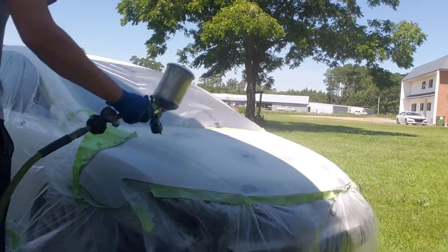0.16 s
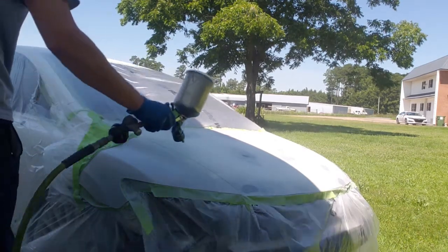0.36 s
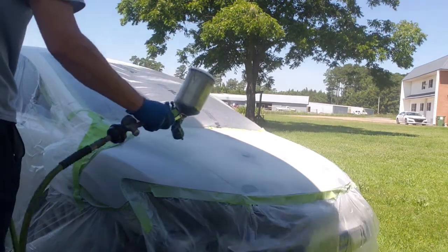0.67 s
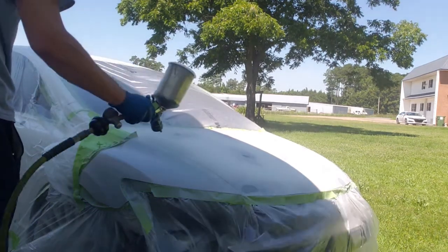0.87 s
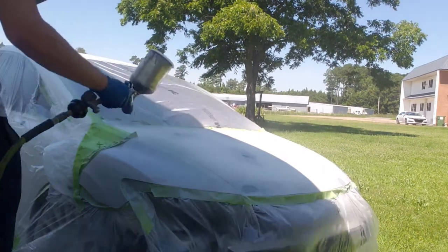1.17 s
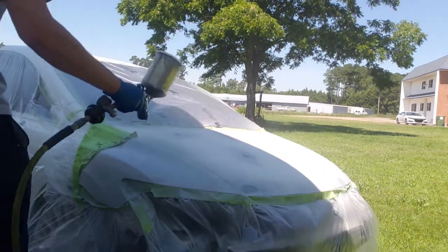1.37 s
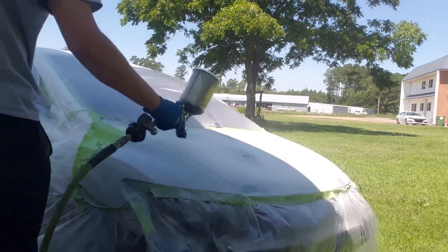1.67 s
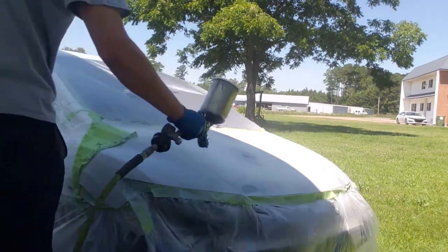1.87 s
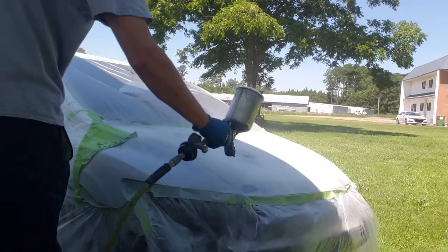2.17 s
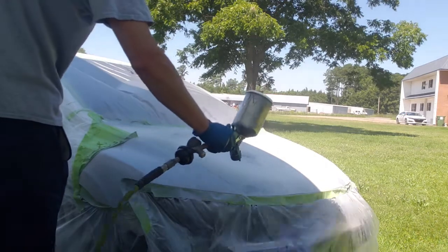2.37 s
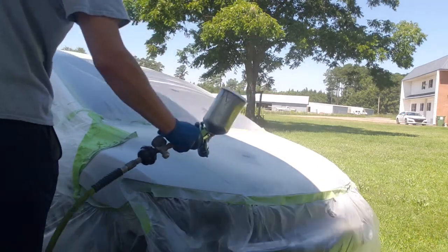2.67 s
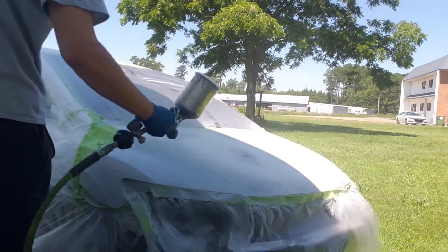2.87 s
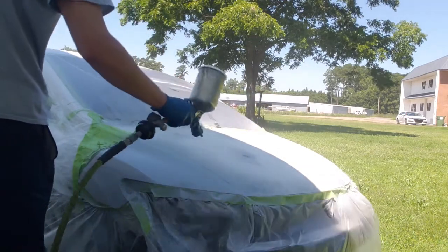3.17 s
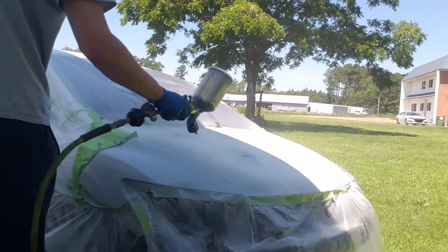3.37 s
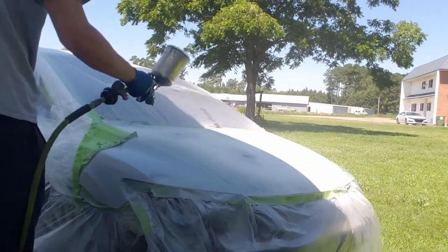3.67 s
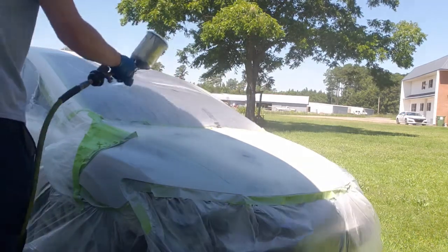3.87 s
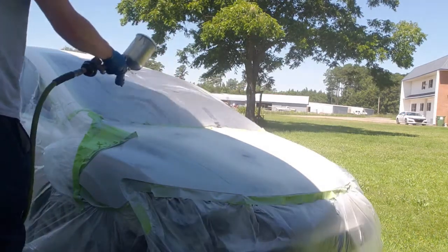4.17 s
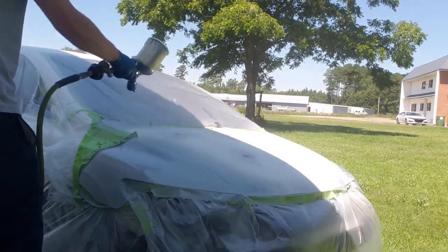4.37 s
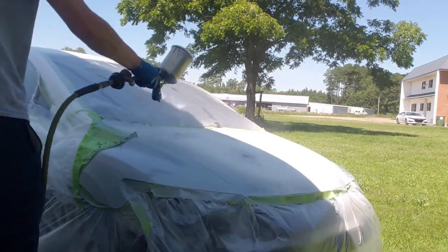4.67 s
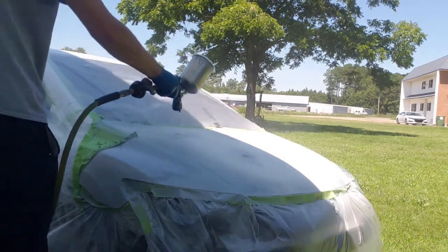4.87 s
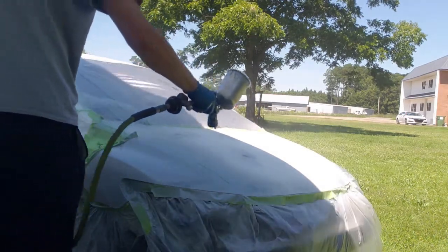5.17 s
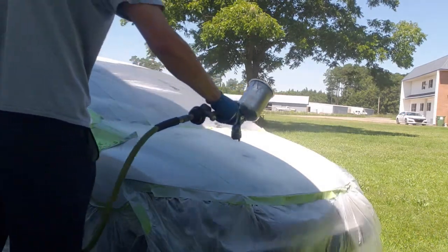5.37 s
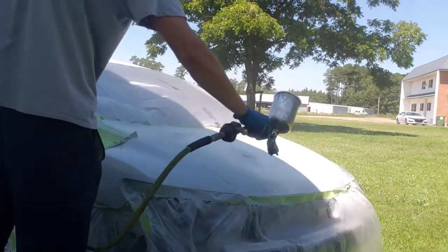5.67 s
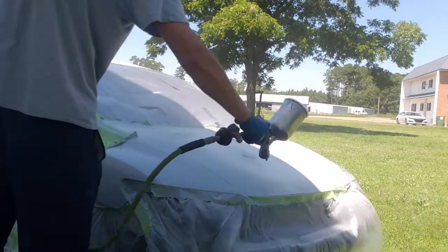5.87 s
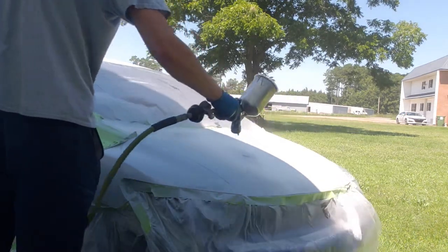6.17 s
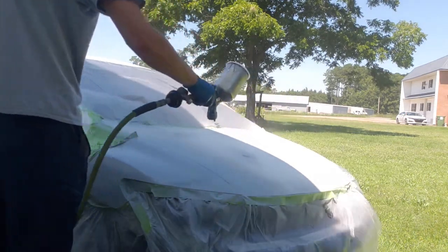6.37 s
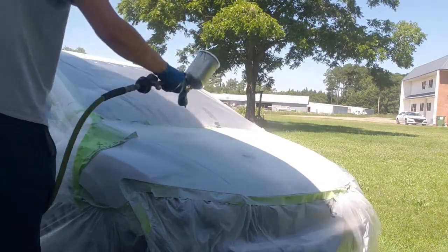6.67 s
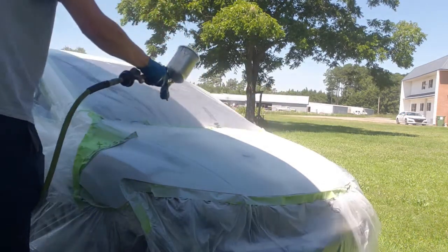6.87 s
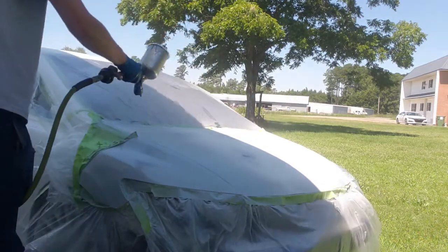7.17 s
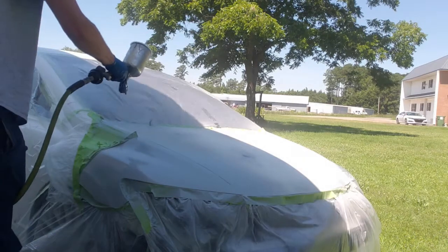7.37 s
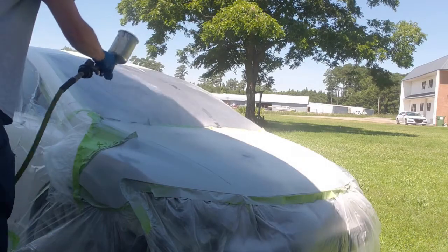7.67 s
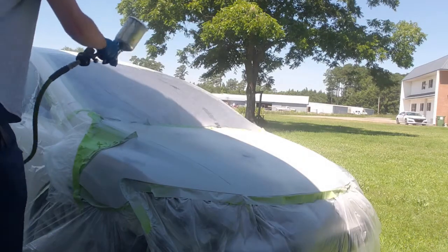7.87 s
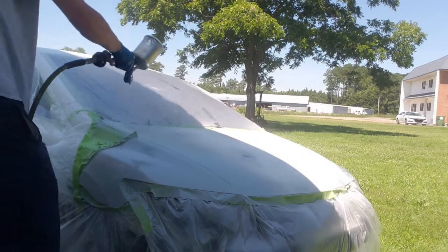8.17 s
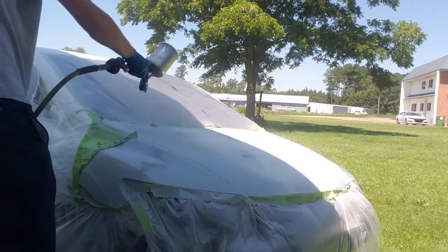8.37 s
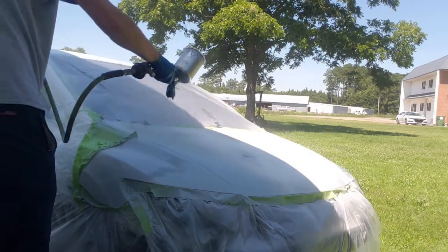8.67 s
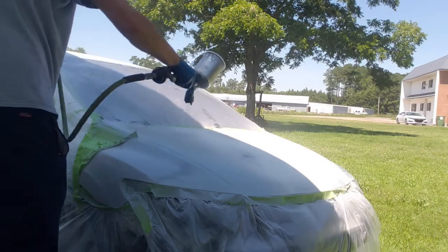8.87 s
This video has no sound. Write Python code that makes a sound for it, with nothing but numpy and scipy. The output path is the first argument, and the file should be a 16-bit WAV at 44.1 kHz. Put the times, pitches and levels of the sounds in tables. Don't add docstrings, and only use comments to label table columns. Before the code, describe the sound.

A paint spray gun hisses brightly in three long bursts outdoors, with two brief gaps of thin leaking air over faint low rumble.

```python
import sys
import numpy as np
from scipy import signal
from scipy.fft import rfft, irfft, next_fast_len
from scipy.io import wavfile
from scipy.ndimage import uniform_filter1d

SR = 44100
rng = np.random.default_rng(int(sys.argv[2]) if len(sys.argv) > 2 else 0)


def gain_from_db(level_db):
    decades = np.asarray(level_db, float) / 20
    return 10 ** decades


def unload_audio(sound):
    columns = np.transpose(np.atleast_2d(sound))
    steps = np.round(np.clip(columns, -1, 1) * 32767)
    wavfile.write(sys.argv[1], SR, steps.astype(np.int16))


N = 397782

# (valve opens [s], valve closes [s])
VALVE_S = [
    (-1.0, 3.606),
    (3.977, 7.655),
    (8.071, 10.0),
]
# (time [s], lag of left behind right [samples], echo strength [dB])
SWEEP = [(0, 3, 0), (.6, 2.1, 0), (1.25, 4.5, 0), (1.75, 1.2, 0), (2.25, -.1, 0), (2.75, 1.2, 0),
         (3.3, 1.2, 0), (3.95, 4.2, 2), (4.4, 4.5, 1), (4.75, 2.4, 1), (5.75, -2.1, 0), (6.6, 1.2, 2),
         (7.0, 4.5, 3), (7.75, 5.2, 4), (8.2, 4.2, 2), (8.55, 5, 2), (8.8, 2.2, 1), (9.02, 1.2, 1)]

FRAME, HOP = 512, 128
HZ = np.arange(FRAME // 2 + 1) * SR / FRAME
FRAME_S = np.arange(N // HOP + 2) * HOP / SR
T = np.arange(N) / SR


def on_log(table, hz, column=1):
    rows = np.array(table, float)
    return np.interp(np.log(hz + 1), np.log(rows[:, 0]), rows[:, column])


def on_time(table, t):
    s, *columns = np.array(table, float).T
    return [np.interp(t, s, c) for c in columns]


def swells(rows, t, column=2):
    return sum(r[column] * np.exp(-((t - r[0]) / r[1]) ** 2) for r in rows)


def blotches(seconds, hz):
    field = rng.standard_normal((len(HZ), len(FRAME_S)))
    for axis, span in enumerate((hz * FRAME / SR, seconds * SR / HOP)):
        for _ in range(2):
            field = uniform_filter1d(field, max(int(span), 1), axis=axis)
    return field / field.std()


def hiss(db, alike=1):
    # (frequency [Hz], share common to both ports [0-1])
    likeness = [(200, .995), (400, .92), (700, .7), (1400, .9), (2600, .95), (4000, .9), (8000, .65),
                (15000, .45)]
    body_samples, body_share, body_top_hz = 17.5, .45, 9000
    draw = rng.standard_normal((2, 4, len(HZ), len(FRAME_S)), dtype=np.float32)
    cells = draw[0] + 1j * draw[1]
    share = alike * on_log(likeness, HZ)[:, None]
    around = body_share * (np.clip(HZ / 1000, 0, 1) / (1 + (HZ / body_top_hz) ** 4))[:, None]
    lag = on_time(SWEEP, FRAME_S)[0]
    late = np.exp(-2j * np.pi * HZ[:, None] * (body_samples - lag) / SR)
    detour = cells[1] * np.array([late, np.ones_like(late)])
    common = np.sqrt(1 - around) * cells[0] + np.sqrt(around) * detour
    cells = np.sqrt(share) * common + np.sqrt(1 - share) * cells[2:]
    return signal.istft(cells * gain_from_db(db), nperseg=FRAME, noverlap=FRAME - HOP)[1][:, :N]


def port_colour(table, pan_db):
    colour = np.array([on_log(table, HZ, column=1), on_log(table, HZ, column=2)])[:, :, None]
    shade = np.clip(HZ / 9000, 0, 1)[:, None] * (pan_db - pan_db.mean()) / 2
    return colour + np.array([shade, -shade]) - 60 * (HZ < 150)[:, None]


def jet():
    # (time [s], hiss level [dB], nozzle turned from the left port [dB])
    hand = [(0.0, -28, -2), (0.45, -27, -4.5), (1.0, -31, -5), (1.5, -30.5, -3.5), (1.95, -28.5, -5),
            (2.3, -29.5, -4.5), (2.9, -29.5, -5.5), (3.55, -31, -6), (4.05, -29, -7), (4.55, -29, -4.5),
            (4.95, -27.5, -4.5), (5.3, -31, -7), (5.75, -25.5, -5), (6.2, -30.5, -7), (6.7, -30.5, -4),
            (7.2, -31.5, -9), (8.15, -26.5, -6.5), (9.02, -28, -5.5)]
    # (time [s], half length [s], level [dB])
    surges = [(.51, .04, 3), (.74, .03, 1.5), (1.25, 0.043, 2.5), (2.34, .06, 2.5), (3.05, .03, -0.5),
              (3.26, 0.076, 4.5), (3.45, 0.095, 2.5), (3.59, .03, 2), (4.22, 0.046, 0), (5.63, 0.046, 0.5),
              (5.78, 0.026, 1), (7.12, .04, -0.5), (8.45, 0.2, -2), (6.6, 0.22, 2.5), (7.5, 0.11, -1.5),
              (4.9, 0.08, 1.5)]
    # (frequency [Hz], left level [dB], right level [dB])
    colour = [(197, -27.5, -26.5), (323, -26.5, -25.5), (515, -27, -27), (795, -21, -23.5),
              (1296, -16, -18), (1760, -16, -14), (3130, -11.5, -12), (4800, -12.5, -7.5),
              (6500, -8.5, -9.5), (7130, -14, -12.5), (10160, -6.5, -5.5), (12350, -7.5, 5),
              (14800, -4, -2), (16100, -1, 9.5)]
    # (time [s], centre frequency [Hz], level over the hiss [dB])
    spit_rows = [
        (.552, 3200, 9.5),
        (2.398, 3000, 7.5),
        (3.22, 3230, 7.5),
        (3.577, 3600, 3),
        (5.7, 2980, 5.5),
        (7.612, 3000, 0),
        (8.198, 4500, 6.5),
    ]
    octave = np.log2(HZ + 1)[:, None]
    hand_db, pan_db = on_time(hand, FRAME_S)
    lag, echo_db = on_time(SWEEP, FRAME_S)
    top_db = hand_db + swells(surges, FRAME_S)
    change, away = top_db - top_db.mean(), lag - lag.mean()

    rush = (0.067 - 1) * change - 0.39 * away
    body = (0.23 - 1) * change + 0.04 * away
    tilt = 0
    for move, centre in ((rush, 10), (body, 11.75)):
        near = np.clip(1 - abs(np.clip(octave, 10, 13.5) - centre) / 1.75, 0, 1)
        tilt = tilt + move * near

    shade_hz, shade_octaves, shade_db_per_echo_db = 6450, 0.49, -0.5
    shaded = np.exp(-((octave - np.log2(shade_hz)) / shade_octaves) ** 2)
    tilt = tilt + shade_db_per_echo_db * echo_db * shaded

    flutter = 0.31 * blotches(.03, 7000) + 0.59 * blotches(.006, 7100) + .5 * blotches(0.072, 4000)
    spits = 0
    for s, hz, db in spit_rows:
        spits = spits + db * np.exp(-((FRAME_S - s) / 0.0072) ** 2 - ((octave - np.log2(hz)) / 0.69) ** 2)
    own = np.array([blotches(0.26, 180), blotches(0.28, 180)])
    patches = 2.8 * own + 2.05 * blotches(0.17, 100)
    patches *= np.clip(HZ / 1500, 0, 1)[:, None] / (1 + (HZ[:, None] / 20000) ** 2)
    return hiss(port_colour(colour, pan_db) + top_db + tilt + flutter + spits + patches - 14.0)


def valve(air):
    puff_db = [
        0,
        12,
        14.5,
    ]
    open_s, burst_s, creep_s, puff_hz = .009, .018, .008, 7000
    shut_t60_s, hose_db, hose_t60_s, hose_hz = 0.015, -5.5, 0.34, 1300
    flow, puff, bleed = 0, 0, 0
    for (opens, closes), burst_db in zip(VALVE_S, puff_db):
        since = np.clip(T - opens, 0, None)
        after = np.clip(T - closes, 0, None)
        creep = np.clip((T - opens + creep_s) / (open_s + creep_s), 0, 1) ** 2
        flow = flow + creep * gain_from_db(-60 * after / shut_t60_s)
        burst = gain_from_db(burst_db * np.exp(-(since / burst_s) ** 2)) - 1
        puff = puff + np.clip(since / open_s, 0, 1) ** 3 * burst
        bleed = bleed + (after > 0) * gain_from_db(hose_db - 60 * after / hose_t60_s)
    treble = signal.sosfilt(signal.butter(1, puff_hz, "high", fs=SR, output="sos"), air)
    hose = signal.sosfilt(signal.butter(1, hose_hz, fs=SR, output="sos"), air[::-1])
    return flow * air + puff * treble + bleed * hose


def paths(sound):
    echo_rows = [(29.47, -0.32, 2, 0.11, 0.17), (39.1, -0.7, 2.5, -0.1, -0.18),
                 (49.93, -1.05, -8, 0.25, 0.034), (85.3, 4.5, -9, 0.21, 0.18),
                 (112.3, 2.5, -1, 0.36, -0.086), (147.5, 0, -13, 0.21, 0.097),
                 (206.2, 2.5, 13.5, 0.11, -0.17), (317.8, -4.0, 25, 0.28, -0.19)]
    echo_band_hz = [500, 11000]
    lag, echo_db = on_time(SWEEP, T)
    lag = uniform_filter1d(lag, SR // 4)
    finer = 3
    fine = finer * irfft(rfft(sound, next_fast_len(N)), finer * next_fast_len(N))
    grid = np.arange(fine.shape[1]) / finer
    dull = signal.butter(1, echo_band_hz, "band", fs=SR, output="sos")
    out = []
    for port in range(2):
        here = np.arange(N) - lag * (1 - port)
        echoes = 0
        for extra, per_lag, right_extra, *gains in echo_rows:
            arrival = here - extra - per_lag * lag - right_extra * port
            echoes = echoes + gains[port] * np.interp(arrival, grid, fine[port])
        direct = np.interp(here, grid, fine[port])
        out.append(direct + gain_from_db(echo_db) * signal.sosfilt(dull, echoes))
    return np.array(out)


def rumble():
    # (frequency [Hz], level per Hz [dB])
    spectrum = [(20, -38), (33, -28), (42, -4), (60, -2), (75, -5.5), (92, 0), (120, -9.5), (160, -23),
                (400, -35.5), (800, -40), (1500, -64)]
    # (time [s], half length [s], hum swell
    # [dB], buffet swell [dB])
    gusts = [(.15, 0.1, 11, 15.5), (.95, 0.11, -1, 14.5), (1.56, 0.16, 7.5, 8), (1.9, .12, 2, 10),
             (2.25, .2, 3.5, 6), (3.3, .3, 2.5, 8), (3.8, 0.085, -0.5, -19), (4.57, .12, 3.5, 5),
             (5.65, 0.26, -4, 7.5), (6.5, 0.066, 3, 11), (7.55, 0.22, -9.5, 17), (7.9, 0.11, 0.5, -41),
             (8.2, 0.22, 7, 14.5)]
    hz = np.fft.rfftfreq(N, 1 / SR)
    hum, side, buffet = irfft(rfft(rng.standard_normal((3, N))) * gain_from_db(on_log(spectrum, hz)), N)
    buffet_band = signal.butter(2, [130, 320], "band", fs=SR, output="sos")
    buffet = signal.sosfilt(buffet_band, np.gradient(buffet))
    wander = [np.interp(T, FRAME_S, blotches(0.088, SR)[0]) for _ in range(2)]
    hum_db = -58 - 0.5 * wander[0] + swells(gusts, T, column=2)
    buffet_db = -69 + 2 * wander[1] + swells(gusts, T, column=3)
    ports = hum * gain_from_db(np.array([[.5], [-.5]])) + .22 * side * np.array([[1], [-1]])
    return gain_from_db(hum_db) * ports / hum.std() + gain_from_db(buffet_db + 2) * buffet / buffet.std()


def thumps():
    # (time [s], peak level [dB], frequency [Hz], decay t60 [s])
    jolts = [
        (0.902, -72.5, 69.5, .08),
        (1.454, -39.5, 70, .12),
        (3.604, -36.5, 73, 0.055),
        (3.983, -49, 66.5, 0.4),
        (7.661, -39, 74, 0.067),
        (8.082, -53, 57, 0.23),
    ]
    out = np.zeros(N)
    for s, db, hz, t60 in jolts:
        t = np.clip(T - s, 0, None)
        swing = gain_from_db(-60 * t / t60) * np.sin(2 * np.pi * hz * t)
        knock = 1.08 * gain_from_db(-60 * t / 0.013) * np.sin(2 * np.pi * 3.16 * hz * t)
        out += gain_from_db(db + 4.5) * (swing + knock)
    return out


def leak():
    # (leak level [dB], swell [dB], body over the leak [dB], left minus right [dB])
    releases = [
        (-54.5, 6.5, -18, -7.5),
        (-52.5, -1.5, -18.5, -9.5),
    ]
    # (frequency [Hz], left level [dB], right level [dB])
    colour = [(900, -34.5, -38), (1530, -31, -29.5), (2430, -16.5, -18), (3600, -24.5, -22),
              (5200, -16.5, -10.5), (8100, -14, -16), (8840, -9, -3), (10050, -12, -1.5), (12600, -4, 10),
              (14400, -8, 1), (15500, -11, 0)]
    # (time [s], extra delay [samples], ripple depth [dB])
    cup_echo = [
        (3.64, 25.3, 4),
        (3.8, 24.5, 5.5),
        (3.97, 23.4, 5),
        (7.7, 24.0, 1.5),
        (8.06, 24.2, 1.5),
    ]
    peak_s, spread_s = 0.25, 0.12
    pull = np.searchsorted([v[0] for v in VALVE_S], FRAME_S) - 1
    pull = np.clip(pull, 0, len(releases) - 1)
    base_db, swell_db, body_db, pan_db = np.array(releases)[pull].T
    since = FRAME_S - np.array(VALVE_S)[pull, 1]
    db = base_db + swell_db * np.exp(-((since - peak_s) / spread_s) ** 2)
    treble = np.clip(HZ / 2000 - 3.5, 0, 1)[:, None]
    extra, depth_db = on_time(cup_echo, FRAME_S)
    ripple = depth_db * np.cos(2 * np.pi * HZ[:, None] * extra / SR) * treble
    ripple = ripple * np.array([.3, 1])[:, None, None]
    patches = 1.3 * blotches(.2, 300) + 1.0 * blotches(.012, 7000)
    tilt = (body_db - body_db.mean()) * (1 - treble)
    air = hiss(port_colour(colour, pan_db) + db + tilt + ripple + patches - 6.0, alike=.5)
    shut = sum((T > a[1]) * (T < b[0] + .001) for a, b in zip(VALVE_S, VALVE_S[1:]))
    return uniform_filter1d(1. * shut, 300) * air


def scene():
    return paths(valve(jet()) + leak()) + thumps() + rumble()


def roll_off(x):
    return signal.sosfilt(signal.butter(12, 17120, fs=SR, output="sos"), x)


def record(dry):
    cut = signal.sosfilt(signal.ellip(12, .2, 80, 15760, fs=SR, output="sos"), dry)
    return roll_off(cut)


dry = scene()
out = record(dry)
unload_audio(out)
```